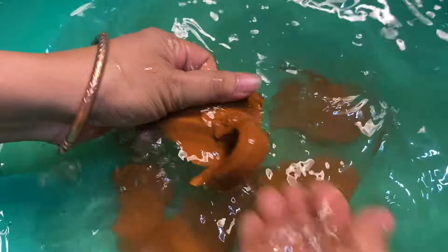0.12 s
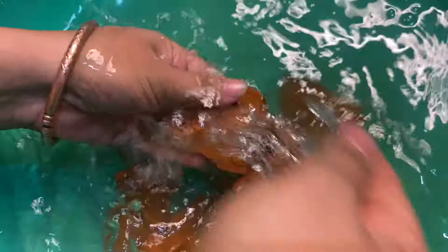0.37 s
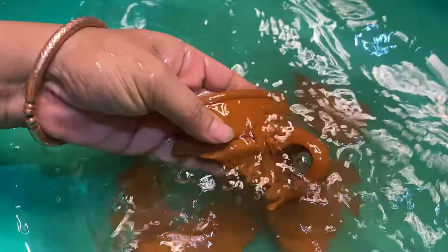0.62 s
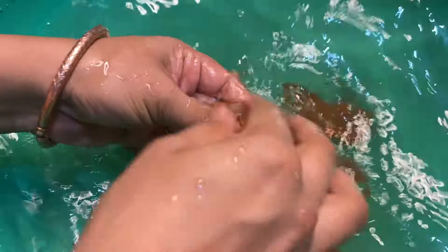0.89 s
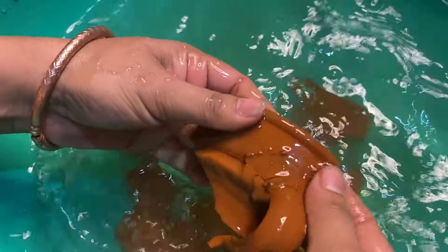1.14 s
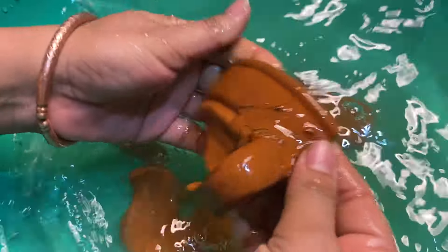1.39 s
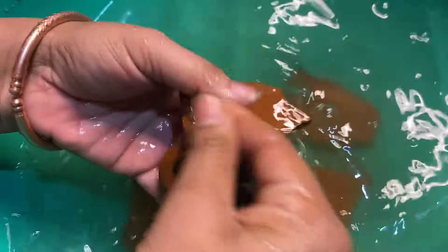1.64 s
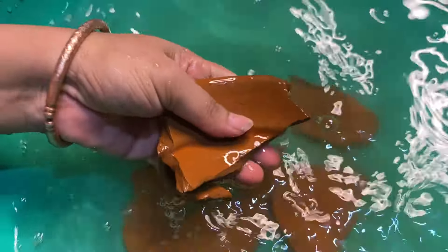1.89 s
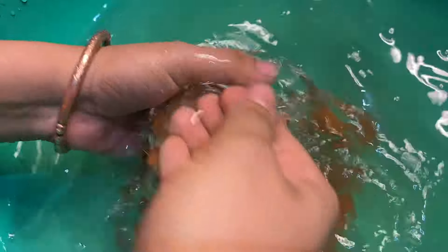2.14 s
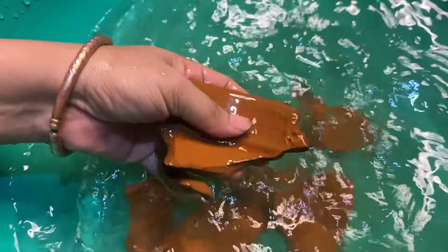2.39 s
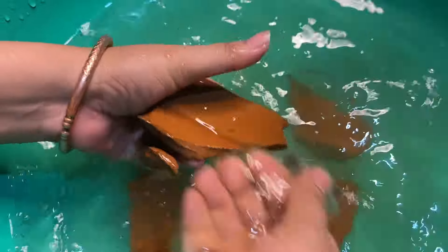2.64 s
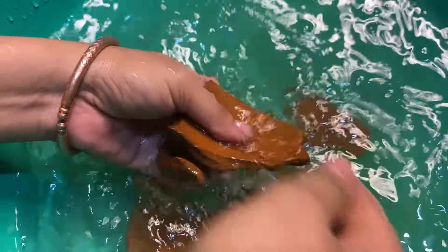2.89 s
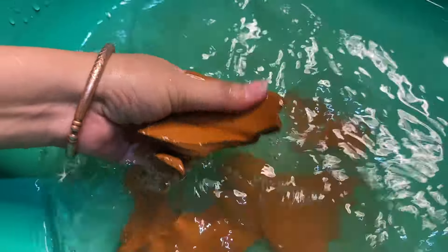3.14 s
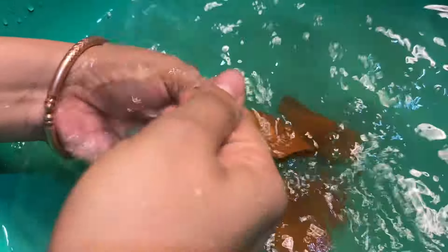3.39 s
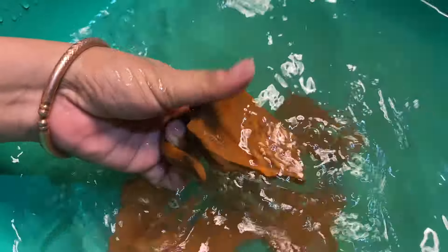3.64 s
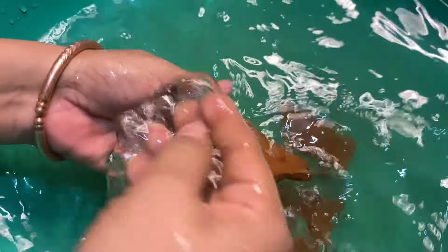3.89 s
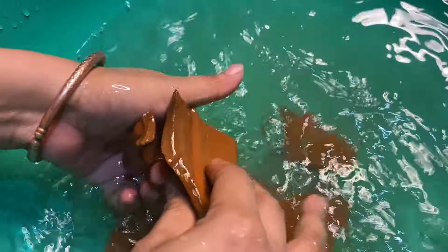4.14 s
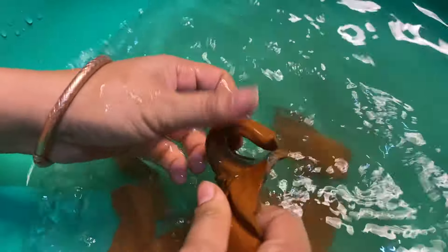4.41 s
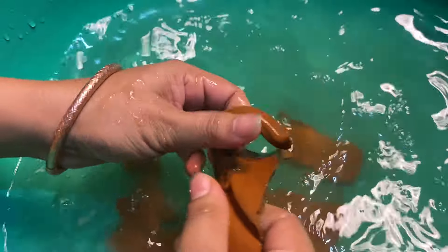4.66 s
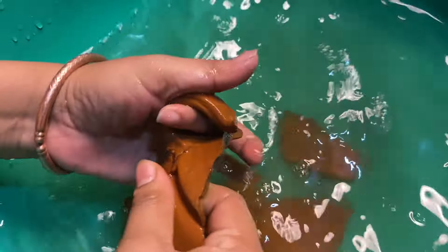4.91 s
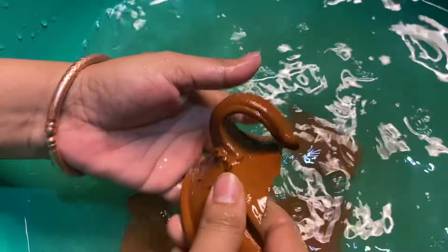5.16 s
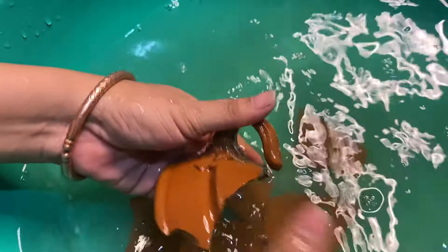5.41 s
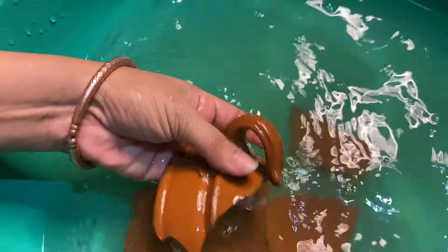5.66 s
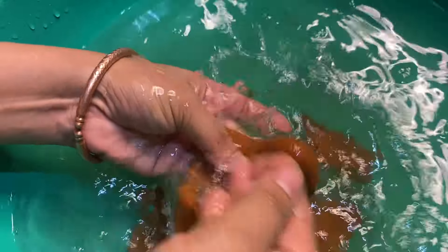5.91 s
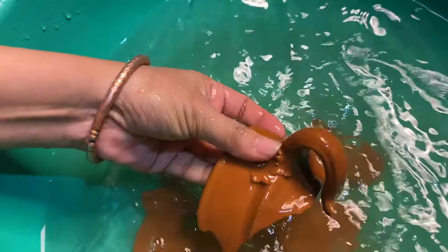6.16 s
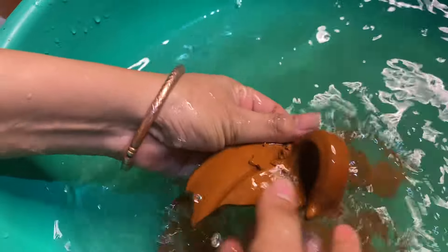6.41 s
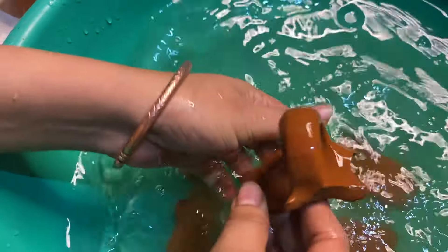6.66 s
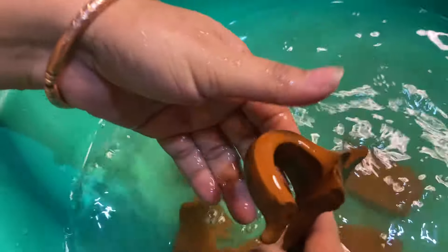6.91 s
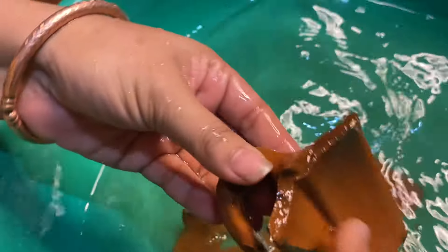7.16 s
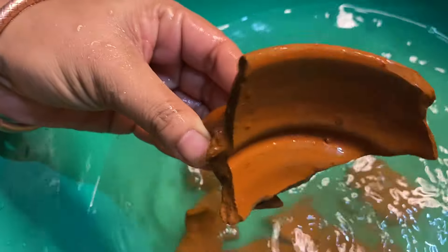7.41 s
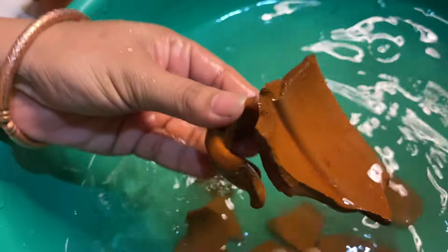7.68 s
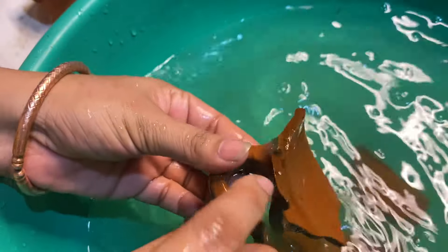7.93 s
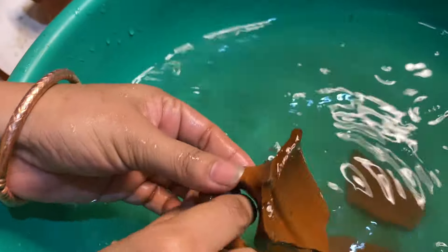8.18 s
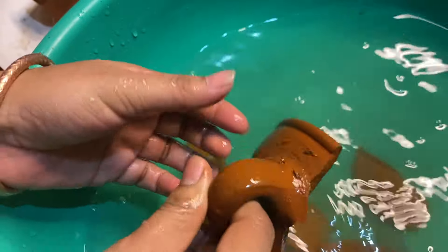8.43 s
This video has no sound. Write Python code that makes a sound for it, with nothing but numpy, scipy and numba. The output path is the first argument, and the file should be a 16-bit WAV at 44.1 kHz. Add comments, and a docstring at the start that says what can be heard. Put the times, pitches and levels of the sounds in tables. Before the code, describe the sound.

Close up, hands scoop water over a broken clay piece above a plastic tub. Quick bursts of gurgles, rising bubble plops and crisp droplets fill the first second, pause, then return busily until about four seconds. A quiet stretch of dribbles and wet rubbing follows, then another splashy burst around six. The end is nearly still, with tiny drips and a faint clay clink. Short tub echoes, soft low sloshing, small hard room, stereo microphone.

```python
"""Water gurgles, plops and splashes close by as hands scoop it over a clay shard above a plastic tub.
Trapped air rings as rising tones, droplets snap as short hiss, and the sloshing tub booms softly as
low noise. Fine fizz goes on between the scoops, with rubs and clinks of clay, faint knocking, a bright
tick and room air. Echoes come from the tub walls and a small hard room; two microphone ports listen."""
import sys
import numpy as np
from scipy import signal
from scipy.fft import rfft, irfft
from scipy.io import wavfile
from scipy.ndimage import uniform_filter1d
from numba import njit

SR = 44100
rng = np.random.default_rng(int(sys.argv[2]) if len(sys.argv) > 2 else 0)


def persist_wave(psi):
    """Save psi, clipped to +-1, as 16-bit WAV."""
    counts = np.round(np.clip(psi, -1, 1) * 32767).astype(np.int16)
    wavfile.write(sys.argv[1], SR, np.atleast_2d(counts).T)


def field_ratio(decibels):
    """Amplitude ratio for a level in dB (20 dB per decade); scalars and array-likes work."""
    return 10 ** (np.asarray(decibels, dtype=float) / 20)


N = 377055
T = np.arange(N) / SR  # time in seconds

# Peak levels are those of each sound as it is made, before the filters, echoes and ports.
# The air of the room. Each row: frequency in Hz, relative strength in dB per Hz.
AIR_SPECTRUM = [(18, -36), (30, 4.5), (499, 1.5), (1250, -15.5), (3670, -21.5), (8980, -9.5), (10800, -15),
                (16000, -7)]
AIR_DB = -70.5
# Soft, regular knocking that slows down. Each row: time in seconds, beat number, peak in dB before trim.
KNOCK_BEATS = [(1.165, 0, -58), (1.747, 13, -58), (5.187, 89, -62), (5.512, 96, -62), (6.781, 123, -62),
               (7.546, 139, -69), (8.52, 159, -66)]
# A bright steady tick, perhaps a drip. Each row: time in seconds, beat number, peak in dB before trim.
TICK_BEATS = [(4.276, 0, -55), (5.397, 11, -56), (6.949, 26, -57), (8.448, 41, -59)]
# The sloshing tub. Each row: frequency in Hz, relative strength in dB per Hz.
SLOSH_SPECTRUM = [(18, -44.5), (30, -23.5), (70, 3), (155, -4), (189, 3), (220, -2), (350, -3.5),
                  (460, -39.5), (770, -120)]
# Water surges against the tub. Each row: peak time in seconds, level in dB, seconds to fade by 20 dB.
TUB_SURGES = [(0.04, -48.5, 0.5), (.52, -46, 0.5), (0.671, -44.5, 0.4), (.97, -54, 0.62), (1.6, -63.5, 1),
              (2.0, -54, 1), (2.2, -49.5, 1.64), (2.57, -52, 1), (3.24, -47.5, 0.35), (3.48, -49.5, 0.3),
              (4.07, -56, 0.3), (4.571, -53, 0.44), (5.0, -59.5, 0), (5.78, -62, 1.07), (6.21, -58.5, 0.4),
              (7.76, -71.5, 0.2)]
# Water knocks on the tub wall. Each row: time in seconds, peak in dB, pitch in Hz.
WALL_KNOCKS = [(0.503, -31, 136), (0.62, -35.5, 178), (1.659, -50.5, 83), (2.168, -33, 397),
               (2.551, -41.5, 90), (3.204, -34, 331), (3.438, -27, 400), (4.56, -32, 335),
               (6.187, -43.5, 78.2)]
STILL_TUB_DB, FLUTTER_DB = -92, 2.5  # resting level; random spread of the boom
# Air standing in the tub. Each row: pitch in Hz, width in Hz, level in dB.
TUB_RESONANCES = [(490, 210, -2), (815, 40, -5.5)]
TUB_FADE_S, TUB_DB = 0.0045, -10.5  # wall echo: seconds to fall to 1/e; level before its bass cut
ROOM_T60_S, ROOM_DB, ROOM_TOP_HZ = 0.45, -18.5, 2200  # room echo: fade by 60 dB; level before bass cut
# Wet fingers on clay. Each row: start in seconds, peak in dB, centre in Hz, length setting in seconds.
CLAY_RUBS = [(4.412, -63, 3980, 0.042), (5.206, -62.5, 3630, .1), (7.632, -62.5, 1400, 0.048),
             (8.419, -64, 2810, .06), (5.303, -51.5, 2203, 0.25), (7.277, -50, 1184, 0.1),
             (7.427, -52, 3690, 0.039)]
# The shard rings when touched. Each row: time in seconds, peak in dB, pitch in Hz.
SHARD_CLINKS = [(7.331, -54, 2400), (7.862, -76, 2150)]
CLINK_T60_S = 0.13
# Water trickles off hands and clay. Each row: time in seconds, level in dB before the offsets below.
TRICKLE_LEVELS = [(0, -78), (1.5, -66.5), (4.3, -68.5), (5.5, -69), (6.8, -67.5), (7.4, -71), (7.7, -81.5),
                  (8.55, -84)]
TRICKLE_GURGLE_DB, TRICKLE_DROPLETS_DB, TRICKLE_SPRAY_DB = -15, -13, 1.0  # added to that level
# Thrown water rains back. Each row: peak time in seconds, droplet level in dB, seconds to fade by 20 dB
# (sign ignored), spray level relative to the droplets in dB.
RAIN_BACKS = [(0.0, -44, .5, -9.5), (.14, -47.5, 0.1, -1), (.26, -44, 0.54, -4), (0.368, -38, 0.18, -1),
              (.44, -41, -0.11, -0.5), (.5, -45, -0.14, 6.5), (0.701, -41, 0.41, -7.5),
              (0.887, -34.5, 0.11, -8), (1.015, -44.5, 0.22, -5), (1.818, -45.5, 0.1, -4.5),
              (1.3, -65, 1.5, -1), (2.01, -51.5, 2.5, -3.5), (2.102, -40, 0.35, -8), (2.188, -37, 0.12, 0),
              (2.4, -47.5, 0.25, -4), (2.7, -47.5, 0.42, 4.5), (2.8, -39, 0.16, -5.5),
              (3.04, -59, 1.65, 1.5), (3.2, -55.5, 2, -8), (3.391, -43, 0.5, -1.5),
              (3.437, -42.5, 0.29, -5.5), (3.828, -41.5, 0.05, -8), (3.951, -40.5, 0.1, 3.5),
              (4.022, -29.5, -0.0254, -3.5), (4.09, -49, -0.005, 2), (5.599, -50.5, 0, -7),
              (5.75, -37, 0.27, -9), (5.898, -41.5, 0.46, -5), (6.071, -41, 0.1453, -9),
              (6.25, -55, 0.29, 4.5), (6.312, -39, 0.1258, -13.5), (6.44, -47.5, 0.08, 1),
              (6.52, -48.5, -0.06, 0), (6.62, -52, -0.11, -5.5), (7.0, -60.5, 0.25, -7.5),
              (7.349, -74.5, 1.5, 6)]
# A hand dips, scoops or empties and the water gurgles. Each row: peak time in seconds, level in dB,
# seconds to fade by 20 dB (sign ignored).
HAND_DIPS = [(0.0, -45.5, 1.5), (0.371, -36, 0.13), (.56, -38, 0), (.7, -37, 0.3047), (0.891, -35, 0.06),
             (1.25, -71, -2), (1.818, -57, 1.5), (1.95, -55.5, 0), (2.049, -43.5, 0.43),
             (2.188, -38.5, 0.37), (2.528, -41.5, -0.13), (2.708, -37.5, 0.17), (2.8, -36.5, 0.25),
             (3.048, -44, 0.3), (3.249, -45, 0.8), (3.437, -36, 0.325), (3.83, -40.5, 0.1559),
             (4.017, -34.5, 0.11), (4.251, -50.5, 0.11), (4.575, -55.5, 0.36), (5.56, -57, 0.1),
             (5.75, -54.5, 0.1), (5.898, -40.5, 0.1868), (6.168, -44, 0.1449), (6.31, -46, 0.46),
             (6.419, -34.5, 0.0919), (7.76, -66, 0.26)]
DIP_RISE_S, SPLASH_RISE_S, SURGE_RISE_S = 0.04, 0.045, 0.12  # seconds to rise by 20 dB
CALM_GURGLE_SPREAD_DB = 2.5
# Loud droplet snaps. Each row: time in seconds, peak in dB, centre in Hz.
LOUD_SNAPS = [(0.0258, -28.5, 9050), (0.0748, -29, 12600), (0.3299, -17, 4565), (0.4213, -19.5, 7160),
              (0.437, -18.5, 4950), (0.4914, -17, 11010), (0.4951, -17, 13880), (0.695, -15, 4520),
              (0.99, -23, 3600), (1.82, -28, 3476), (1.88, -39.5, 2920), (1.944, -21.5, 5020),
              (2.046, -31, 5155), (2.12, -23.5, 4930), (2.168, -16.5, 7030), (2.218, -22.5, 5860),
              (2.315, -24.5, 5890), (2.397, -22, 6620), (2.472, -23, 8040), (2.511, -31, 3790),
              (2.5342, -14, 14530), (2.625, -23.5, 14910), (2.7717, -25.5, 11140), (2.801, -27.5, 4980),
              (2.9912, -31, 7630), (3.0087, -21.5, 11520), (3.0204, -25, 11000), (3.15, -38, 4490),
              (3.2126, -30.5, 4290), (3.42, -25, 3940), (3.503, -19, 3880), (3.606, -20, 6870),
              (3.715, -27, 4310), (3.7552, -30, 6830), (3.9558, -26, 4050), (4.0004, -15, 4050),
              (4.211, -38, 4900), (4.275, -35, 4490), (5.6418, -34.5, 6790), (5.716, -34, 6050),
              (5.755, -32.5, 4740), (5.8007, -31, 4150), (5.8454, -29, 6060), (5.8586, -15.5, 10020),
              (5.889, -18.5, 8460), (5.9543, -22, 6410), (6.0483, -20.5, 10930), (6.069, -16, 10840),
              (6.1886, -22, 6660), (6.2076, -26, 4515), (6.246, -28.5, 3490), (6.2709, -24.5, 6924),
              (6.4185, -26, 7190), (7.117, -43, 3030), (7.262, -40, 9110), (7.2748, -31, 11510),
              (7.33, -38, 4320), (7.437, -47.5, 5000), (7.747, -55.5, 4500), (8.27, -51, 11170)]
# Big bubbles. Each row: time in seconds, peak in dB, starting pitch in Hz, length setting in ms.
LARGE_BUBBLES = [(0.01, -21.5, 450, 2.7), (0.045, -15, 1880, 3), (0.097, -33, 900, 6.3),
                 (0.31, -27, 1520, 2.8), (0.354, -26.5, 507, 4.4), (0.366, -19.5, 1380, 4),
                 (0.402, -28, 810, 12), (0.425, -14.5, 2400, 1.1), (0.505, -20.5, 580, 3.3),
                 (0.575, -27.5, 1730, 11.6), (0.578, -19, 900, 6), (0.608, -24.5, 1784, 4.6),
                 (0.628, -24.5, 490, 7.6), (0.709, -15, 1316, 4), (0.752, -17, 847, 7.5),
                 (0.775, -22, 710, 7.8), (0.858, -18, 740, 2.9), (0.893, -28.5, 567, 9.2),
                 (1.808, -31.5, 3300, 1.2), (2.051, -21, 1825, 3), (2.14, -27, 1780, 12),
                 (2.216, -20.5, 3120, 1.4), (2.148, -27, 870, 18), (2.167, -21, 3130, 2.6),
                 (2.174, -10, 500, 3.7), (2.195, -23.5, 1505, 6.2), (2.385, -27, 3000, 2.3),
                 (2.396, -27.5, 1840, 3.7), (2.47, -29, 1340, 4.9), (2.534, -28, 2070, 3),
                 (2.513, -15.5, 1480, 1.6), (2.334, -27.5, 515, 4.6), (2.634, -21, 1990, 3.7),
                 (2.661, -26.5, 1240, 5.4), (2.676, -26, 773, 15), (2.703, -23, 834, 9.2),
                 (2.729, -23, 1270, 5.7), (2.732, -25, 940, 5.7), (2.817, -20.5, 530, 4.3),
                 (2.847, -20, 3240, 1.45), (2.912, -17, 1195, 4), (3.01, -13.5, 2490, 0.87),
                 (3.051, -31.5, 550, 6.7), (3.096, -33.5, 1060, 8.3), (3.1, -32, 494, 10),
                 (3.232, -24, 2300, 1.7), (3.244, -32.5, 1730, 7), (3.308, -20.5, 666, 5.1),
                 (3.421, -13.5, 850, 4.9), (3.449, -15.5, 440, 2.1), (3.502, -24.5, 1200, 6.7),
                 (3.64, -35, 2320, 3.7), (3.608, -22, 3040, 1.9), (3.676, -16.5, 1090, 4.2),
                 (3.814, -17.5, 1250, 6.5), (3.847, -24, 1350, 4), (3.968, -22.5, 2280, 1.8),
                 (4.0, -19.5, 890, 2.5), (4.019, -22.5, 3420, 2.5), (4.011, -24.5, 1530, 3.7),
                 (4.036, -18, 970, 1.65), (4.256, -39.5, 3500, 3.4), (4.264, -22.5, 502, 3.6),
                 (4.32, -39, 3170, 1.2), (4.562, -24, 467, 14), (4.561, -25, 900, 3.8),
                 (4.638, -33.5, 1060, 2.4), (4.641, -32.5, 490, 5.4), (4.885, -46, 493, 3.3),
                 (4.946, -47.5, 495, 3.6), (4.995, -43, 470, 2.7), (5.171, -50.5, 4120, 2.7),
                 (5.235, -51, 4390, 1.55), (5.49, -43.5, 1460, 4.3), (5.548, -40.5, 936, 18),
                 (5.741, -22, 2830, 3.6), (5.974, -26.5, 3180, 3), (6.048, -29, 3100, 3),
                 (5.804, -24.5, 1580, 3), (5.885, -26, 1286, 4.1), (5.94, -33, 547, 9.8),
                 (5.966, -22, 1255, 2), (6.15, -24, 1024, 6.6), (6.192, -17, 2620, 2.3),
                 (6.29, -14, 1580, 1.5), (6.3, -22, 2200, 3.8), (6.335, -26, 4270, 2.9),
                 (6.381, -29.5, 4550, 1.8), (6.419, -9.5, 1050, 4.8), (6.419, -18.5, 1437, 9.1),
                 (6.426, -22, 2280, 5.5), (6.453, -30, 1068, 9.4), (6.498, -29.5, 3780, 1.2),
                 (6.524, -31, 3190, 1.3), (6.602, -40, 1750, 4), (6.621, -42.5, 3520, 4.7),
                 (6.995, -57.5, 1650, 14), (7.003, -39, 4530, 2.3), (7.091, -50, 2970, 2.9),
                 (7.19, -42.5, 2000, 2.1), (7.33, -31.5, 2324, 5), (7.446, -48.5, 3940, 5.2),
                 (7.747, -43.5, 650, 2), (7.745, -52.5, 1676, 7.5), (8.185, -55.5, 3380, 1.7)]
BUBBLE_RISE_OCTAVES = 0.15  # over that length
# Falling water punches a hollow that closes, so its tone sweeps upward. Each row: time in seconds,
# peak in dB, starting pitch in Hz, length setting in ms, rise in octaves over that length.
CLOSING_HOLLOWS = [(0.685, -20.5, 870, 9, 0.47), (2.024, -28.5, 1405, 16, 0.7),
                   (2.051, -22.5, 943, 11.3, 0.54), (2.29, -27, 615, 8, 0.4), (3.056, -36, 900, 7.3, 0.74),
                   (3.684, -29.5, 1350, 10.4, 0.39), (3.825, -34.5, 753, 15, 0.63),
                   (3.89, -27.5, 698, 14, 0.54), (5.593, -32.5, 1765, 9, 0.88),
                   (5.895, -32, 479.7, 22, 0.42), (6.155, -29, 1180, 10, 0.63),
                   (6.321, -13, 900, 8.5, 0.64), (6.401, -8.5, 593, 17.7, 0.88)]
# Overall tone colour. Each row: frequency in Hz, level in dB, left minus right in dB. The treble falls away
# steeply above about 15.7 kHz.
TONE_COLOUR = [(25, -10, 0), (58, -0.5, 1.5), (600, -7, 2), (2000, 1.5, -1), (4144, 2.5, 5.5),
               (8000, 4.5, -0.5), (12900, 6.5, 0), (15750, 7.5, 0), (16150, -27.5, -0.5)]
# How the ports fall out of step. Each row: frequency in Hz, radians by which the left one leads.
LEFT_LEAD = [(330, 0), (600, 1.3), (2000, .4), (6900, 0), (8950, -3.14), (11100, -6.28), (13280, -9.42),
             (15450, -12.6), (16500, -13)]


def along(table, hz, column=1):
    """A table column read on a log-frequency axis."""
    table = np.array(table, float)
    return np.interp(np.log(hz + 1), np.log(table[:, 0] + 1), table[:, column])


def coloured(spectrum, alike_hz):
    """Stereo noise of rms 1; left and right grow more different above about alike_hz."""
    hz = np.arange(N // 2 + 1) * SR / N
    mid, side = rfft(rng.standard_normal((2, N))) * field_ratio(along(spectrum, hz))
    side = side * hz / (hz + alike_hz)
    x = irfft(np.array([mid + side, mid - side]), N)
    return x / x.std()


def walk(rate):
    """Random levels, rate of them a second, joined by straight slopes; spread near 1."""
    k = int(SR / rate)
    steps = np.repeat(rng.standard_normal(N // k + 1), k)
    return 1.453 * uniform_filter1d(steps, k)[:N]


@njit
def ring(start, peak, hz, ring_s, rise, push_s, pan, lag, rough, noise):
    """Decaying resonances of rising pitch (octaves a second), driven by a push that swells and fades."""
    out, grain = np.zeros((2, len(noise) + 64)), np.zeros(16384)
    for k in range(len(start)):
        i0 = int(start[k] * SR)
        n = min(int((ring_s[k] + 8 * push_s[k]) * SR) + 2, 16384, len(noise) - i0)
        fade = np.exp(-np.log(1000) / (ring_s[k] * SR))
        ease = np.exp(-1 / (push_s[k] * SR))
        step, climb = 2 * np.pi * hz[k] / SR, 2 ** (rise[k] / SR)
        swing, soft, kick, push, phase, top = 0j, 0j, 1., 0., 0., 1e-12
        for i in range(n):
            kick, push = kick * ease, push * ease + kick
            swing = swing * fade + push * (1 - rough + rough * noise[i0 + i])
            soft = soft * fade ** 2 + swing  # a second stage keeps the rough push near the resonance
            grain[i] = soft.real * np.sin(phase) + soft.imag * np.cos(phase)
            phase, step = phase + step, min(step * climb, 3.)
            top = max(top, abs(grain[i]))
        for i in range(n):
            out[0, i0 + i + max(-lag[k], 0)] += grain[i] * peak[k] / top * pan[k]
            out[1, i0 + i + max(lag[k], 0)] += grain[i] * peak[k] / top / pan[k]
    return out[:, :len(noise)]


def grains(s, db, hz, ring_s, rise, push_s, pan_db, rough, lag_ms_per_db=0.):
    """Plays a set of grains, louder at one port and, where a lag is set, sooner there too."""
    # a single value holds for every grain
    columns = np.broadcast_arrays(s, db, hz, ring_s, rise, push_s, pan_db)
    s, db, hz, ring_s, rise, push_s, pan_db = (1. * c for c in columns)
    noise = rng.standard_normal(N) + 1j * rng.standard_normal(N)
    lag = np.clip(pan_db * lag_ms_per_db * SR / 1000, -60, 60).astype(int)  # in samples
    start = np.clip(s, 0, T[-1])
    ring_s, push_s = np.maximum(ring_s, 1e-4), np.maximum(push_s, 1e-5)
    return ring(start, field_ratio(db), hz, ring_s, rise, push_s, field_ratio(pan_db / 2), lag, rough, noise)


def swarm(level_db, count, spread_db):
    """Random moments whose loudness follows the level; a few are far louder than the rest."""
    chance = rng.random((count, 5)).T
    s = chance[0] * T[-1]
    i = (s * SR).astype(int)
    extra = np.minimum(-np.log(1 - chance[1]), 2.5)
    db = level_db[i] + np.broadcast_to(spread_db, N)[i] * extra
    return s, db, chance[2:]


def swells(s, db, fade_s, rise_s, rest_db):
    """Level in dB of movements that rise to a peak and fade, summed as powers over a resting level."""
    late = T[::64] - s[:, None]
    drop = np.where(late < 0, -late / rise_s, late / np.abs(fade_s)[:, None])
    power = field_ratio(db[:, None] - 20 * drop) ** 2
    return 10 * np.log10(np.repeat(power.sum(0), 64)[:N] + field_ratio(rest_db) ** 2)


def room_air():
    """Steady noise shaped like the quiet air of the room."""
    return field_ratio(AIR_DB) * coloured(AIR_SPECTRUM, alike_hz=30000)


def beats(table, hz, ring_s, trim_db):
    """One short rough grain per beat, evenly spaced between the listed beats, with uneven loudness."""
    s, beat, db = np.transpose(table)
    every = np.arange(beat[-1] + 1)
    times = np.interp(every, beat, s)
    levels = np.interp(every, beat, db) + trim_db + 3 * rng.standard_normal(len(every))
    return grains(times, levels, hz, ring_s, 0, 0.0008, 4, rough=0.9)


def room(x):
    """Decaying noise echoes: a brief one from the tub walls, a duller, longer one from the tiled room."""
    t = T[:int(ROOM_T60_S * SR)]
    # each port has its own echo, starting after 1.5 ms
    walls, tiles = rng.standard_normal((2, 2, len(t))) * (t > 0.0015)
    walls = signal.lfilter(*signal.butter(1, 4000, fs=SR), walls * np.exp(-t / TUB_FADE_S))
    uneven = field_ratio(3.5 * walk(76)[:len(t)])
    tiles = tiles * uneven * np.exp(-np.log(1000) * t / ROOM_T60_S)
    tiles = signal.lfilter(*signal.butter(2, ROOM_TOP_HZ, fs=SR), tiles)
    parts = ((TUB_DB, walls), (ROOM_DB, tiles))
    tail = sum(field_ratio(db) * part / np.sqrt(np.sum(part ** 2) / 2) for db, part in parts)
    tail = signal.lfilter(*signal.butter(1, 450, "high", fs=SR), tail)  # thin plastic lets bass through
    return signal.fftconvolve(x, tail, axes=1)[:, :N]


def tub_air(x):
    """The air in the tub rings briefly at its low resonances."""
    return sum(field_ratio(db) * signal.lfilter(*signal.iirpeak(hz, hz / width, fs=SR), x)
               for hz, width, db in TUB_RESONANCES)


def slosh():
    """Surging water makes the tub boom: low noise that swells and flutters in level."""
    boom_db = swells(*np.transpose(TUB_SURGES), SURGE_RISE_S, STILL_TUB_DB) + FLUTTER_DB * walk(12)
    return field_ratio(boom_db) * coloured(SLOSH_SPECTRUM, alike_hz=900)


def thumps():
    """Water shoving the tub wall, which rings for a few low cycles."""
    s, db, hz = np.transpose(WALL_KNOCKS)
    return grains(s, db, hz, 9.0 / hz, 0, 0.5 / hz, 0.15, rough=0.)


def rubs():
    """Wet fingers sliding over the clay: a short swell of hiss."""
    s, db, hz, length_s = np.transpose(CLAY_RUBS)
    return grains(s, db, hz, 0.002, 0, 0.34 * length_s, 3.5, rough=1.)


def clinks():
    """Fired clay holding one tone."""
    s, db, hz = np.transpose(SHARD_CLINKS)
    return grains(s, db, hz, CLINK_T60_S, 0, 0.00089, 1.96, rough=0.5)


def spray(level_db):
    """Thousands of tiny snaps, from bright to very bright."""
    s, db, (size, life, side) = swarm(level_db, count=4000, spread_db=5.8)
    hz = 5500 * 2 ** (1.4 * size)
    push_s = 0.00018 + 0.0016 * life
    return grains(s, db, hz, 0.00043, 0, push_s, 3 * (side - 0.5), rough=0.92)


def snaps():
    """Droplets bursting on skin and clay: a millisecond or two of broad hiss."""
    s, db, hz = np.transpose(LOUD_SNAPS)
    return grains(s - 0.001, db, hz, 3.5 / hz, 0, 0.0008, 0.1, rough=0.75)


def small_bubbles(level_db, low_hz, octaves, cycles, calm_spread_db, count):
    """A crowd of smaller bubbles, most torn apart after a few cycles."""
    # loudness spreads by calm_spread_db in calm water
    spread_db = np.interp(level_db, (-70, -50), (calm_spread_db, 4.6))
    s, db, (size, life, side) = swarm(level_db, count, spread_db)
    hz = low_hz * 2 ** (octaves * size)
    ring_s = (2.74 + cycles * life ** 3) / hz
    rise = 0.4 * life / ring_s
    pan_db = 9 * (side - 0.25)
    return grains(s, db, hz, ring_s, rise, 0.11 * ring_s, pan_db, rough=0.5, lag_ms_per_db=0.027)


def big_bubbles(s, db, hz, length_ms, rise_octaves, rough):
    """Pockets of air in the water: nearly pure tones that swell, climb and fade."""
    length_s = length_ms / 1000
    pan_db = 3.5 + 3 * rng.standard_normal(len(s))
    tones = grains(s - 0.001, db, hz, 2.23 * length_s, rise_octaves / length_s, 0.08 * length_s,
                   pan_db, rough, lag_ms_per_db=0.01)
    # the surface closing over the air
    slaps = grains(s - 0.001, db - 13.0, 1.8 * hz, 3.3 / hz, 0, 0.0017, pan_db, rough=0.91)
    return tones + slaps


def scene():
    """Water close by, its echoes, the tub's boom and the room air."""
    trickle_db = np.interp(T, *np.transpose(TRICKLE_LEVELS))
    gurgle_db = swells(*np.transpose(HAND_DIPS), DIP_RISE_S, trickle_db + TRICKLE_GURGLE_DB)
    s, db, fade_s, fine_db = np.transpose(RAIN_BACKS)
    droplet_db = swells(s, db, fade_s, SPLASH_RISE_S, trickle_db + TRICKLE_DROPLETS_DB)
    spray_db = swells(s, db + fine_db, fade_s, SPLASH_RISE_S, trickle_db + TRICKLE_SPRAY_DB)

    close = beats(KNOCK_BEATS, 800, 0.006, trim_db=-2) + beats(TICK_BEATS, 4200, 0.0005, trim_db=-2)
    close = close + rubs() + clinks()
    treble_only = signal.butter(2, 2000, "high", fs=SR, output="sos")
    close = close + signal.sosfilt(treble_only, snaps() + spray(spray_db))
    close = close + small_bubbles(gurgle_db, 500, 2.7, 18, CALM_GURGLE_SPREAD_DB, count=3800)
    close = close + small_bubbles(droplet_db, 2000, 1.7, 24, 4.5, count=3200)
    close = close + big_bubbles(*np.transpose(LARGE_BUBBLES), BUBBLE_RISE_OCTAVES, rough=0.3)
    close = close + big_bubbles(*np.transpose(CLOSING_HOLLOWS), rough=0.08)
    # small things radiate no bass
    close = signal.sosfilt(signal.butter(2, 170, "high", fs=SR, output="sos"), close)
    return close + tub_air(close) + room(close) + slosh() + thumps() + room_air()


def roll_off(x):
    """The treble ends steeply here."""
    return signal.sosfilt(signal.butter(12, 16980, fs=SR, output="sos"), x)


def record(dry):
    """The sound takes its overall tone colour; the ports differ in level and hear the treble out of step."""
    hz = np.arange(N // 2 + 1) * SR / N
    # half of each difference goes to either port
    louder = field_ratio(along(TONE_COLOUR, hz, column=2) / 2)
    left = louder * np.exp(0.5j * along(LEFT_LEAD, hz))
    colour = field_ratio(along(TONE_COLOUR, hz))
    mix = irfft(rfft(dry) * colour * np.array([left, 1 / left]), N)
    return roll_off(mix)


dry = scene()
out = record(dry)
persist_wave(out)
```